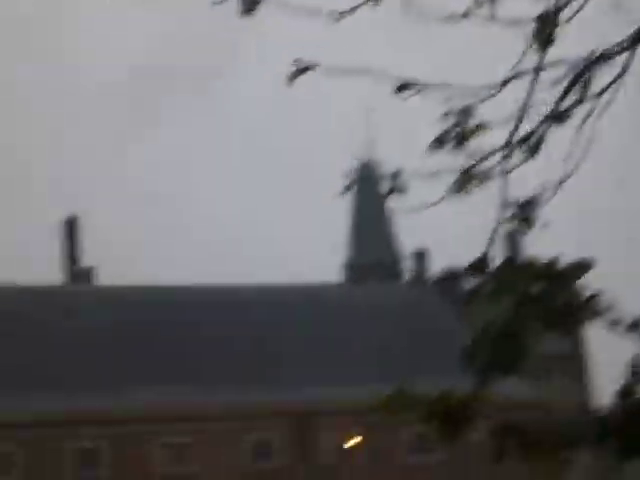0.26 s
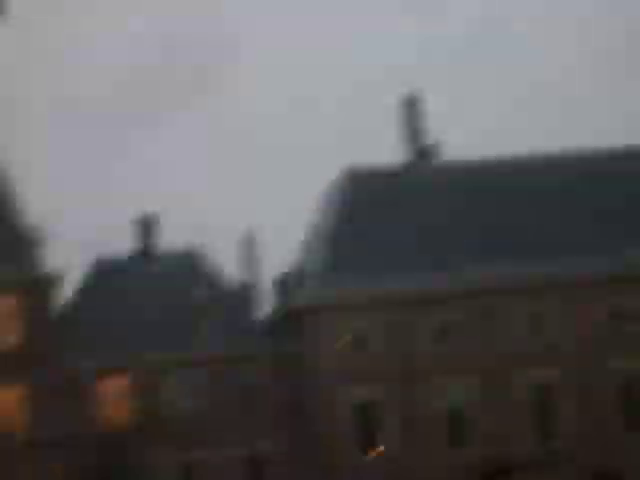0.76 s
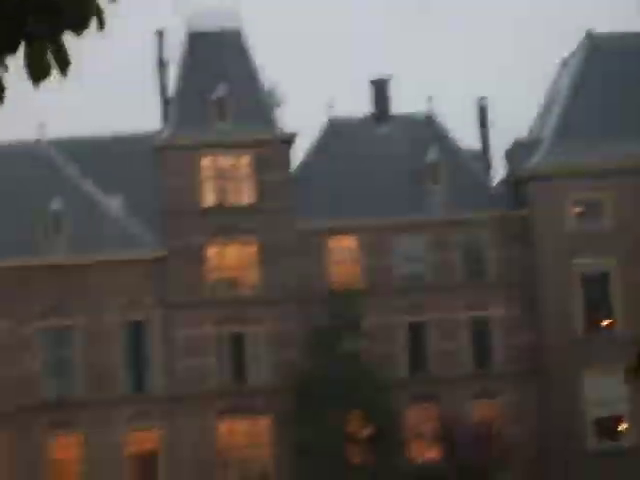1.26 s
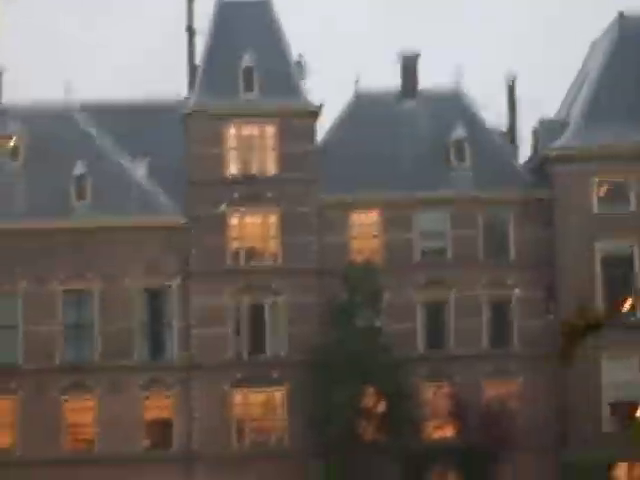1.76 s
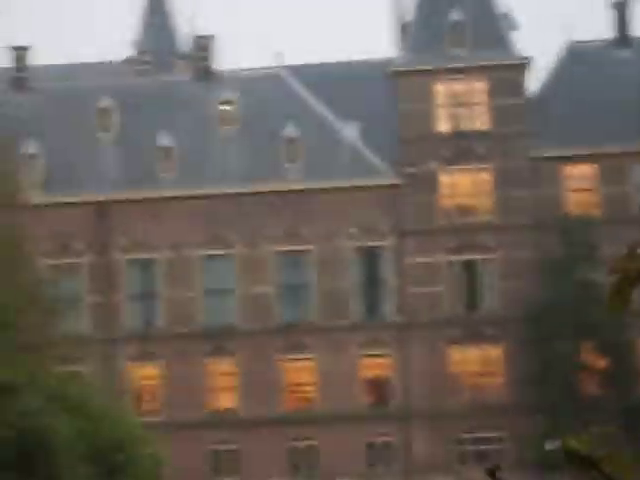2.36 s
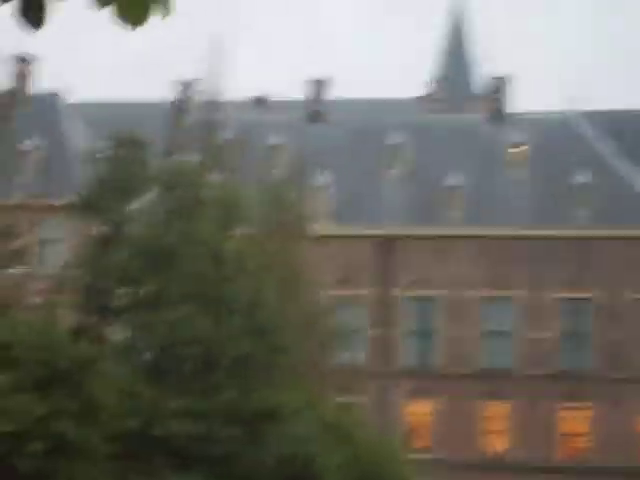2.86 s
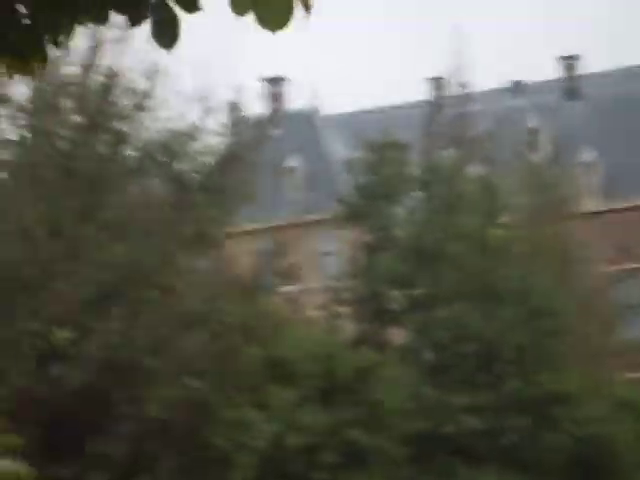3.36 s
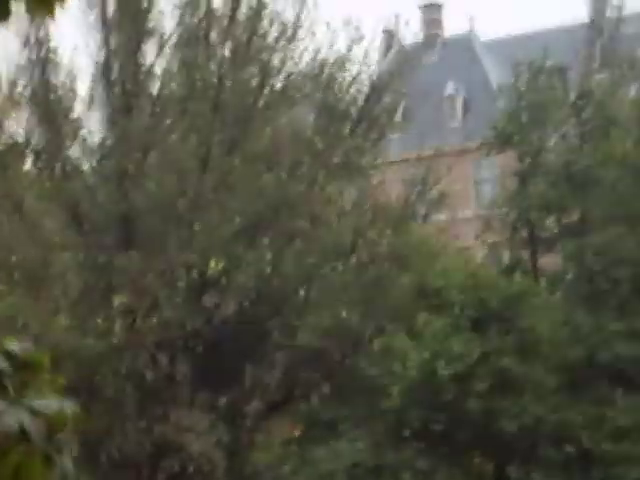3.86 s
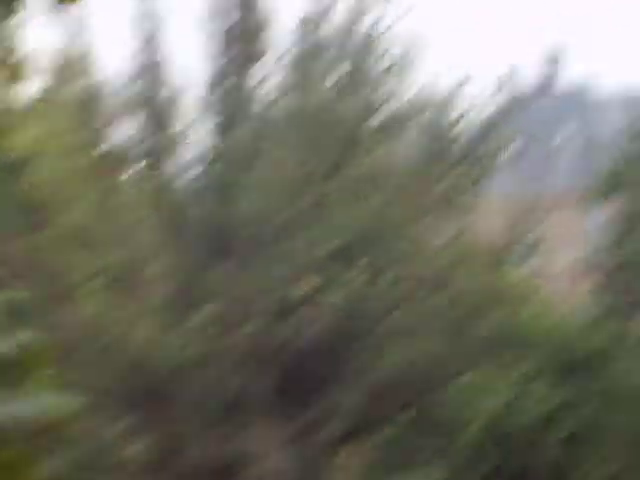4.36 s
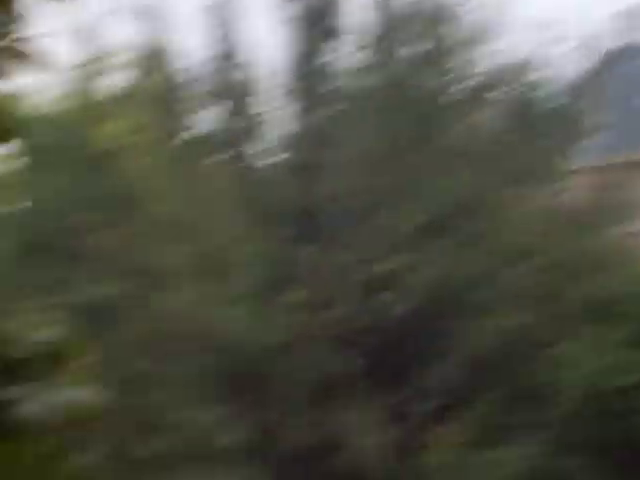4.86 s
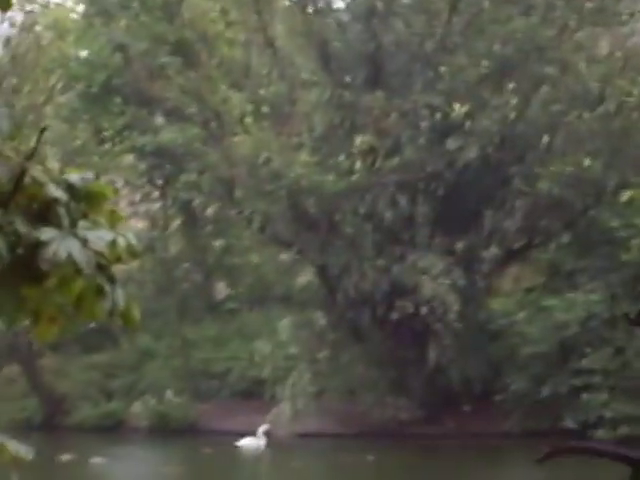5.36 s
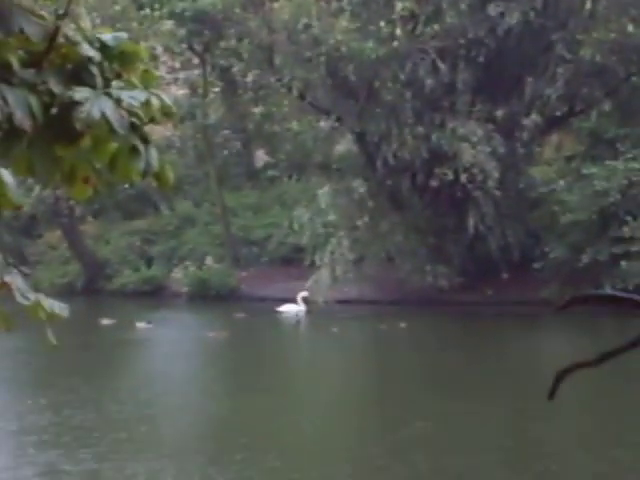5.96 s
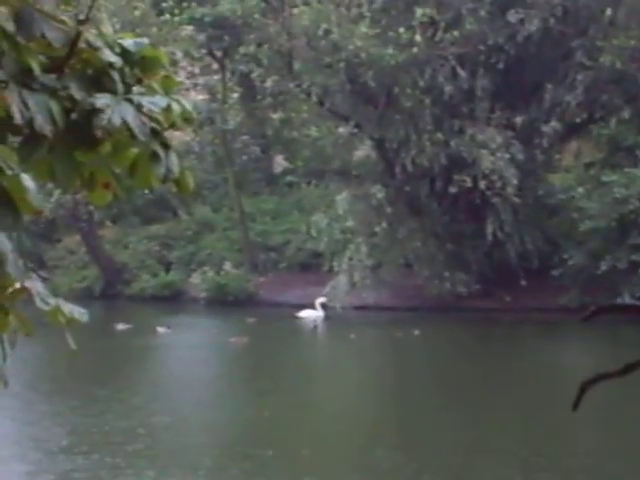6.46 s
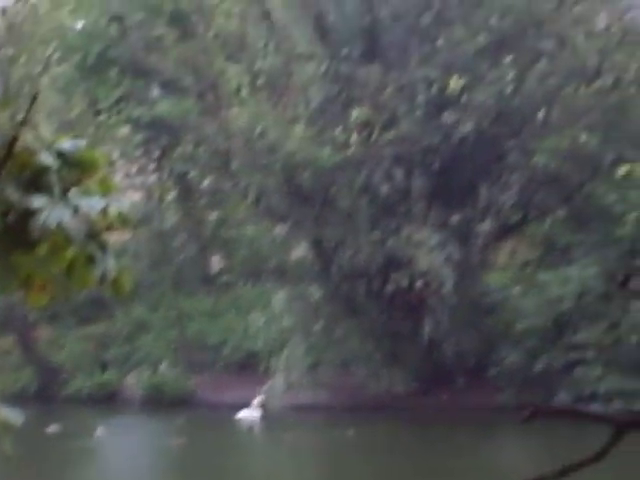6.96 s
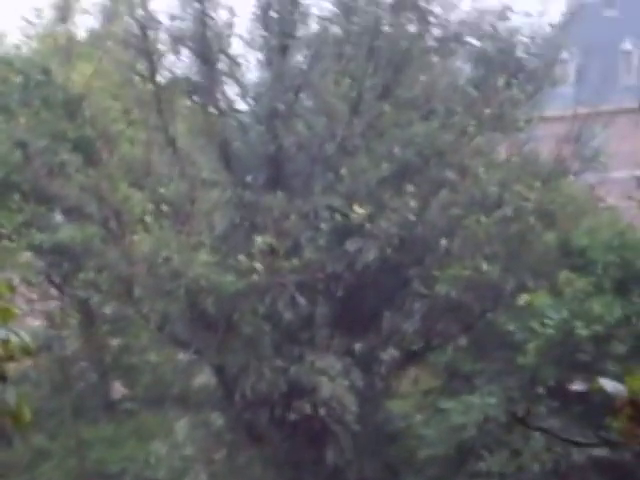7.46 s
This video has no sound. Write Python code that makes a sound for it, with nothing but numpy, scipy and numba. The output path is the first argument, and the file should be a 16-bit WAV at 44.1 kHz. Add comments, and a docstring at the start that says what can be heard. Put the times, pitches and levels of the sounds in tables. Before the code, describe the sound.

A big flock of parakeets screeches harshly by a pond, a hollow low rumble bursts in and fades, cries thin out, and small snaps click nearby.

```python
"""A roost of parakeets by a pond screeches loudly at first: harmonic stacks on gliding pitches, with noise-tail echoes.
Shaped noise hums as a town below, and a small camera ticks faintly at its frame rate: short damped rings.
From 3.1 s resonant noise rumbles in suddenly and rolls away, while the crowd thins and single cries stand clear.
Damped rings snap and knock nearby from 4.7 s; the rumble returns weaker at 4.9 s."""
import sys
import numpy as np
from scipy import signal
from scipy.fft import rfft, irfft
from scipy.io import wavfile
from scipy.ndimage import uniform_filter1d
from numba import njit

SR = 44100
rng = np.random.default_rng(int(sys.argv[2]) if len(sys.argv) > 2 else 0)


def digitize_waveform(pressure):
    """Quantize a signal to 16-bit integers and store it at the path in sys.argv[1].

    Rows of a 2-D input are taken as channels; values are limited to [-1, 1].
    """
    field = np.atleast_2d(pressure).T
    bounded = np.clip(field, -1, 1)
    quanta = np.round(bounded * 32767).astype(np.int16)
    wavfile.write(sys.argv[1], SR, quanta)


N = 340006  # samples


def undb(db):
    """Gain of a level in dB."""
    return 10 ** (np.asarray(db) / 20)


def unit(x):
    """Scales x to rms 1."""
    return x / np.sqrt(np.mean(x ** 2))


def level_curve(table):
    """Level [dB] at every sample, linear between (time, level) rows."""
    time_s, level_db = np.array(table).T
    return np.interp(np.arange(N) / SR, time_s, level_db)


def lowpass(x, order, cutoff_hz):
    """Butterworth low-pass."""
    return signal.sosfilt(signal.butter(order, cutoff_hz, fs=SR, output="sos"), x)


def resonance(x, hz, width_hz):
    """One resonance: a two-pole peak."""
    return signal.lfilter(*signal.iirpeak(hz, hz / width_hz, fs=SR), x)


def colour(x, points):
    """Imposes a smooth spectrum on x, keeps its fine lines, and scales to rms 1."""
    spectrum = rfft(x * signal.windows.tukey(N, 1 / 1000))
    hz, db = np.transpose(points)
    own = np.sqrt(uniform_filter1d(np.abs(spectrum) ** 2, size=1500)) + 1e-12
    log_hz = np.log(np.arange(len(spectrum)) * SR / N + 1)
    # the last two points are left out: the level holds above the one before
    wanted = undb(np.interp(log_hz, np.log(hz[:-2]), db[:-2]))
    return unit(irfft(spectrum * wanted / own, N))


def walk(rate_hz):
    """Smoothed random steps, rms 1."""
    hold = int(SR / rate_hz)
    steps = np.repeat(rng.standard_normal(N // hold + 1), hold)
    return unit(uniform_filter1d(uniform_filter1d(steps, hold), hold)[:N])


def click(start_s, level_db, hz, cycles):
    """A damped sine; its envelope starts at level_db and falls by 1/e in the given cycles."""
    size = 800
    age_s = np.arange(size) / SR
    out, at = np.zeros(N + size), int(start_s * SR)
    out[at:at + size] = undb(level_db) * np.sin(2 * np.pi * hz * age_s) * np.exp(-age_s * hz / cycles)
    return out[:N]


# town spectrum: (frequency [Hz], relative density [dB per Hz])
TOWN_COLOUR = [(15, -47), (25, -15), (65, -1.5), (141, -8), (271, -9.5), (384, -12), (436, -12.5),
               (667, -8), (2280, -4.5), (3240, -21.5), (4710, -8.5), (10000, -30.5), (13000, -68),
               (22000, -120)]
TOWN_DB = -44


def town():
    """Traffic, leaves and far birds blur into a steady wash of shaped noise."""
    return colour(rng.standard_normal(N), TOWN_COLOUR) * undb(TOWN_DB + 0.54 * walk(2.85))


# louder camera ticks: (time [s], starting envelope level [dB])
LOUD_TICKS = [(.32, -24), (.587, -27), (.887, -26), (1.72, -25), (1.953, -30), (2.187, -29), (2.453, -31),
              (2.52, -30), (2.92, -26), (2.953, -31), (3.787, -30), (3.82, -31), (6.82, -30), (7.553, -35),
              (7.587, -34)]
FRAME_HZ, FRAME_TICK_DB, FRAME_TICK_SCATTER_DB = 30, -65, 5


def camera():
    """Damped 10 kHz rings: the louder ticks, and a fainter one of random size with every frame."""
    scatter_db = FRAME_TICK_SCATTER_DB * rng.exponential(size=int(FRAME_HZ * N / SR))
    faint_db = np.minimum(FRAME_TICK_DB + scatter_db, -34)
    faint = list(zip(.02 + np.arange(len(faint_db)) / FRAME_HZ, faint_db))
    return sum(click(s, db, hz=10000, cycles=1.4) for s, db in list(LOUD_TICKS) + faint)


# broad boom resonances: (centre [Hz], width [Hz], relative level [dB])
BOOM_RESONANCES = [(321, 155, 4), (214, 85, -3.5), (470, 290, -12), (895, 280, -26)]
# swells of the deep part: (time [s], peak level [dB])
THUDS = [(3.16, -48), (3.48, -42), (5.36, -48)]
THUD_S = .1  # half width at 1/e
RUMBLE_S, BOOM_DB, BOOM_FALL_DB_PER_S, DEEP_DB, DEEP_FALL_DB_PER_S = 3.115, -37, 8.5, -48, 7
SECOND_ROLL_S, SECOND_ROLL_DB, ROLL_RISE_S = 4.9, -56, .2  # the boom returns, weaker


def rumble():
    """Noise in broad low resonances, a hollow ring at the onset and a deeper part that swells on its own."""
    boom_noise, deep_noise = rng.standard_normal((2, N))
    t = np.arange(N) / SR
    age_s, late_s = t - RUMBLE_S, t - SECOND_ROLL_S
    boom = unit(sum(undb(db) * unit(resonance(boom_noise, hz, width)) for hz, width, db in BOOM_RESONANCES))
    first_roll = undb(BOOM_DB - BOOM_FALL_DB_PER_S * age_s)
    second_roll = undb(SECOND_ROLL_DB - BOOM_FALL_DB_PER_S * late_s)
    second_roll = np.clip(late_s / ROLL_RISE_S, 0, 1) * second_roll
    deep = unit(resonance(resonance(deep_noise, 74, 51), 74, 51))
    swell = undb(DEEP_DB - DEEP_FALL_DB_PER_S * age_s)
    swell = swell + sum(undb(db) * np.exp(-((t - s) / THUD_S) ** 2) for s, db in THUDS)
    ring = np.sin(2 * np.pi * 356 * age_s) * undb(-35 + 0.92 * walk(20)) * np.exp(-(age_s / 0.21) ** 4)
    onset = np.clip(age_s / 0.037, 0, 1)
    return onset * (boom * (first_roll + second_roll) + deep * swell + ring)


# small snaps and knocks: (time [s], starting envelope level [dB], centre [Hz], ring decay [cycles])
SNAPS = [(4.72, -30, 700, .6), (4.745, -24.5, 900, .6), (4.775, -24, 1300, 0.65),
         (4.787, -20.5, 1010, 0.65), (4.799, -26, 1400, .6), (4.874, -18.5, 6500, 1.9),
         (6.41, -18.5, 4968, 1.8), (6.769, -24, 6000, 3.), (7.537, -22, 6460, 1.5)]


def snaps():
    """Small snaps and knocks nearby, each a heavily damped ring."""
    return sum(click(*snap) for snap in SNAPS)


@njit
def syrinx(cries, gains, waver, flutter, edge, n):
    """Each cry is a stack of harmonics on a curved glide; the pitch wavers and the level flutters."""
    out = np.zeros(n)
    for c in range(len(cries)):
        start, size, phase = int(cries[c, 0] * SR), int(cries[c, 1] * SR), 0.
        first, middle, last = cries[c, 2], cries[c, 3], cries[c, 4]
        for j in range(max(0, -start), min(size, n - start)):
            u = j / size
            r = (j + 997 * c) % n  # each cry reads the waver from another place
            bend = 4 * middle - 2 * first - 2 * last
            hz = first + (last - first) * u + bend * u * (1 - u)
            phase += 2 * np.pi * hz * waver[r] / SR
            # sines of the multiples follow from the two before
            turn, before, now, total = 2 * np.cos(phase), 0., np.sin(phase), 0.
            for k in range(gains.shape[1]):
                total += gains[c, k] * now
                before, now = now, turn * now - before
            out[start + j] += total * flutter[r] * min(1., u / edge, (1 - u) / edge)
    return out


def sing(cries, harmonic_db, waver, flutter_db):
    """Sings rows of (start, length, three pitches); a harsh throat blurs every harmonic line."""
    flutter = unit(undb(flutter_db * walk(500)))
    gains = np.sqrt(2) * undb(harmonic_db)
    return syrinx(np.ascontiguousarray(cries), gains, 1 + waver * walk(700), flutter, .12, N)


def echoes(x, t60_s, wet_db):
    """Diffuse return from stone fronts, water and trees: a decaying noise tail."""
    s = np.arange(int(.9 * SR)) / SR
    decay = np.exp(-np.log(1000) * s / t60_s)
    tail = rng.standard_normal(len(s)) * decay * np.minimum(s / .004, 1)
    tail = tail / np.sqrt(np.sum(tail ** 2))
    return x + undb(wet_db) * signal.fftconvolve(x, tail)[:N]


def perches(cries, harmonic_db, waver, flutter_db, returns, count):
    """Deals the cries to several trees, each with its own echo tails of (t60 [s], wet level [dB])."""
    out = 0
    for k in range(count):
        tree = sing(cries[k::count], harmonic_db[k::count], waver, flutter_db)
        for t60_s, wet_db in returns:
            tree = echoes(tree, t60_s, wet_db)
        out = out + tree
    return out


# crowd of further birds: (time [s], level [dB])
CROWD_LEVEL = [(0, -30), (.39, -34.5), (1.29, -32.5), (1.67, -33), (2.04, -31.5), (2.3, -35), (2.6, -33.5),
               (3.3, -34), (3.73, -36.5), (4.1, -37.5), (4.3, -40.5), (4.55, -39), (4.85, -42.5),
               (5.6, -44.5), (6.3, -43.5), (6.66, -41.5), (6.94, -47), (7.54, -51), (7.71, -46)]
# crowd spectrum: (frequency [Hz], relative density [dB per Hz])
CROWD_COLOUR = [(530, -70), (900, -29.5), (1190, -13.5), (1470, -18), (2620, -4.5), (2980, -4.5), (3730, 1),
                (5090, -7), (5630, -11), (7240, -14.5), (10000, -28.5), (13000, -58), (22000, -120)]


def crowd(count=2800):
    """Overlapping short, mostly falling cries at random moments, pitches and levels."""
    u, g = rng.random((count, 3)).T, rng.standard_normal((count, 7)).T
    start_s = u[0] * (N / SR + .2) - .2
    length_s = .04 + .08 * u[1]
    start_hz = 1500 + 1400 * u[2]
    end_hz = start_hz * (.8 + .08 * g[0])
    middle_hz = (start_hz + end_hz) / 2 * (1 + .04 * g[1])
    cries = np.array([start_s, length_s, start_hz, middle_hz, end_hz]).T
    # scatter per cry and per harmonic, on mean levels of harmonics 1-5
    harmonic_db = 2.64 * g[2:3].T + 2.17 * g[2:].T + [-4, -1.0, -6.5, -5.5, -16.0]
    flock = perches(cries, harmonic_db, .025, 3., [(.45, -2)], count=5)
    return colour(flock, CROWD_COLOUR) * undb(level_curve(CROWD_LEVEL) + 0.65 * walk(7))


# cries that stand out: (time [s], length [s], start pitch [Hz], end pitch [Hz],
# level of harmonic 2 [dB], odd harmonics against even [dB])
CRIES = [(0.041, .074, 2200, 2060, -36, -11), (0.069, 0.1, 1928, 1880, -43, -8),
         (0.358, 0.055, 1930, 1920, -40, -22), (0.575, 0.039, 1449, 1449, -40.5, -30),
         (0.608, 0.098, 1942, 1600, -40.5, -9), (.697, .061, 1814, 1800, -36, -26),
         (1.26, 0.076, 2416, 2270, -38, -13), (1.318, 0.052, 2030, 1847, -35.5, -14),
         (1.45, 0.085, 1450, 1170, -44, -4), (1.693, .069, 2520, 2510, -40, -30),
         (1.808, 0.097, 2110, 2200, -43, -25), (1.862, 0.095, 1957, 1670, -39, -12),
         (1.9, .094, 2670, 2340, -39, -21), (2.1, 0.14, 2074, 1560, -38, -9),
         (2.288, 0.047, 2020, 1904, -38.5, -17), (2.536, .053, 2390, 2050, -40, -19),
         (2.612, 0.098, 1860, 1970, -41.5, -8), (2.792, .065, 2450, 2390, -41, -26),
         (3.087, 0.1, 1917, 1920, -41, -8), (3.296, .049, 1720, 1713, -44, -5),
         (3.332, .069, 1545, 1520, -40.5, -8), (3.354, .092, 2540, 1700, -43, -12),
         (3.564, 0.094, 1554, 1474, -40.5, -17), (3.644, 0.051, 2080, 2050, -47, -4),
         (3.795, 0.045, 1590, 1590, -43.5, -13), (3.86, .05, 2040, 1750, -47.5, -2),
         (3.916, 0.091, 2070, 1795, -52, 2), (3.958, 0.062, 1902, 1500, -44, -11),
         (4.084, .073, 2500, 1700, -46, -9), (4.18, .079, 2050, 1967, -50, -2),
         (4.356, .035, 2450, 1603, -47, -12), (4.385, .04, 2300, 1600, -42.5, -7),
         (4.444, 0.067, 2490, 1780, -44.5, -4), (4.467, 0.063, 1975, 1695, -37, -9),
         (4.513, 0.093, 2706, 1780, -39.5, -12), (4.624, .082, 2420, 1600, -45.5, -12),
         (4.57, .05, 2500, 1860, -43.5, -8), (4.7, 0.063, 2510, 1890, -49, -15),
         (4.728, 0.09, 2090, 1610, -40, -6), (4.985, 0.13, 2148, 1473, -42.5, -2),
         (5.19, 0.072, 1295, 1150, -53, -12), (5.206, 0.097, 2890, 1990, -48, -19),
         (5.284, .14, 1936, 1455, -45, -2), (5.524, 0.072, 2610, 2010, -47, -13),
         (5.569, 0.14, 1980, 1490, -43.5, -4.5), (5.602, .069, 2900, 2770, -50, -17),
         (5.79, .07, 2620, 1910, -52, -12), (5.835, .076, 1890, 1623, -51, 1),
         (5.925, .098, 1990, 1646, -47.5, -2), (6.02, .05, 2215, 1945, -50, -16),
         (6.08, .075, 2650, 1735, -49, -17), (6.103, 0.063, 2060, 1676, -48, 2),
         (6.206, 0.071, 1904, 1795, -44, -12), (6.234, .054, 1855, 1350, -51.5, 0),
         (6.35, 0.042, 1285, 1235, -51, 0), (6.384, 0.11, 1790, 2030, -40.5, -16),
         (6.399, 0.048, 1894, 1710, -47.5, 2), (6.484, 0.057, 2870, 1885, -38.5, -25),
         (6.482, 0.12, 1540, 1080, -46.5, -14), (6.607, .06, 1120, 1170, -51, -18),
         (6.579, .07, 2000, 2350, -50, -17), (6.63, .057, 2340, 1850, -49, -14),
         (6.662, 0.079, 1930, 1670, -49, 1), (6.689, .042, 2230, 1970, -44, -15),
         (6.698, 0.116, 1345, 1370, -48.5, -20), (6.723, .085, 2604, 2745, -42, -15),
         (6.794, .052, 2700, 1950, -40.5, -20), (7.187, 0.12, 2110, 1987, -46, -22),
         (7.249, 0.082, 2770, 1743, -45, -15), (7.491, 0.065, 2455, 2440, -48.5, -12),
         (7.575, .08, 2810, 1790, -43.5, -14)]
# cries that start above the turning pitch hold before they fall, lower ones drop first and level off
TURN_HZ, HOLD_PER_KHZ = 1698, 0.0898
FIRST_DB, UPPER_DB = -7.5, -12.5  # fundamental and harmonics 4-5 against the rest


def near_birds():
    """The throat favours harmonics 2 and 3, and of the upper ones that nearest to its high resonance."""
    start_s, length_s, start_hz, end_hz, level, odd = np.array(CRIES, float).T
    hold = .5 + HOLD_PER_KHZ * (start_hz - TURN_HZ) / 1000
    middle_hz = end_hz + (start_hz - end_hz) * hold
    fourth, fifth = (level + UPPER_DB - 8 * ((k * middle_hz - 8200) / 1500) ** 2 for k in (4, 5))
    harmonic_db = np.array([level + odd + FIRST_DB, level, level + odd, fourth, fifth + odd / 2]).T
    rows = np.array([start_s, length_s, start_hz, middle_hz, end_hz]).T
    # short tail: branches and water smear each glide; long tail: the walls
    cries = perches(rows, harmonic_db, .019, 3.5, [(.07, -5), (.5, -8)], count=3)
    return lowpass(cries, 4, 9600)  # air and leaves dull the top


def scene():
    """All but the ticks reach a microphone that fades fast above 10 kHz; the ticks arise behind it."""
    air = town() + rumble() + snaps() + crowd() + near_birds()
    return (lowpass(air, 9, 10500) + camera())[None]


TOP_HZ = 12250


def record(dry):
    """The recorder rolls off its highest octave and cuts the top."""
    soft = lowpass(dry, 5, 11300)
    return signal.sosfilt(signal.ellip(12, .3, 80, TOP_HZ, fs=SR, output="sos"), soft)


dry = scene()
out = record(dry)
digitize_waveform(out)
```